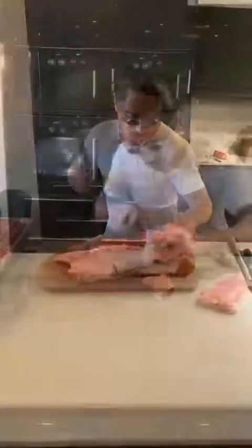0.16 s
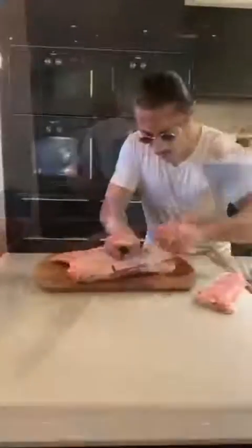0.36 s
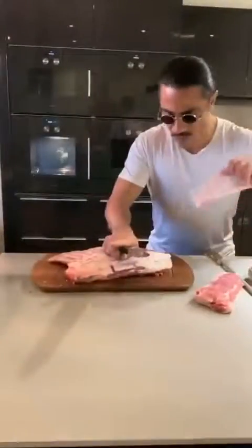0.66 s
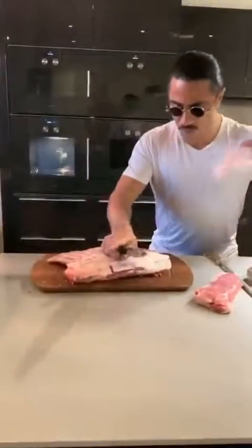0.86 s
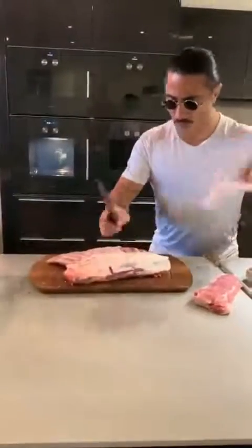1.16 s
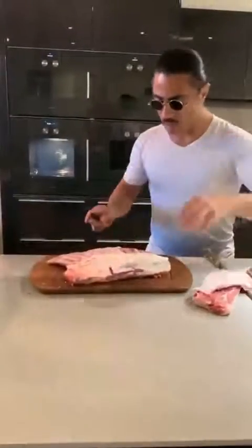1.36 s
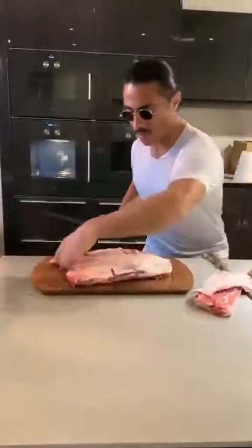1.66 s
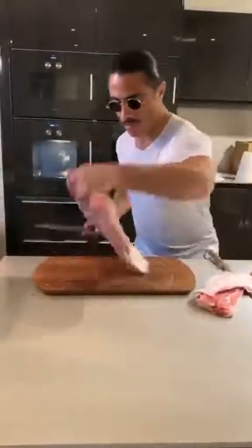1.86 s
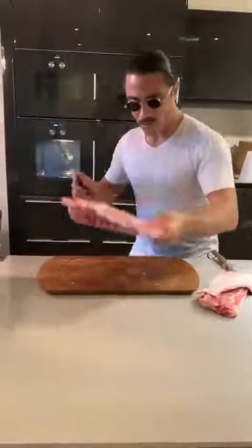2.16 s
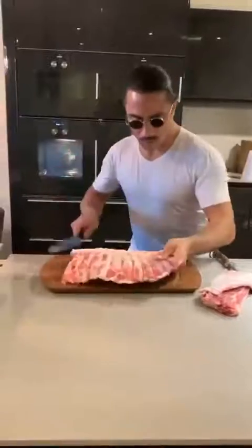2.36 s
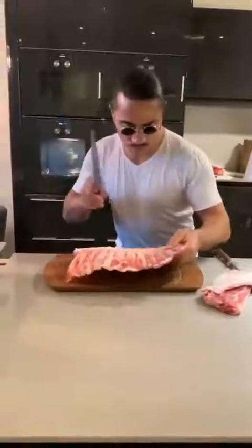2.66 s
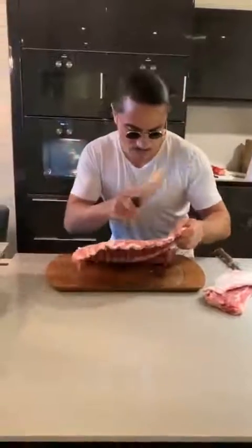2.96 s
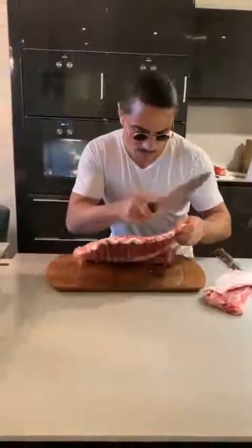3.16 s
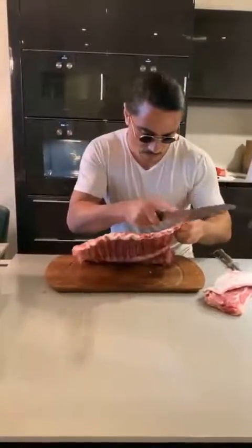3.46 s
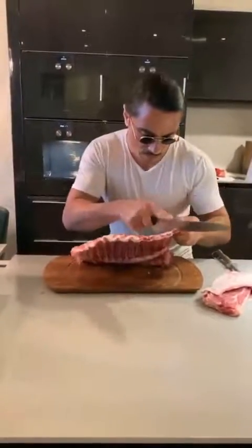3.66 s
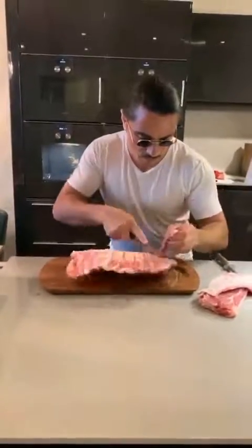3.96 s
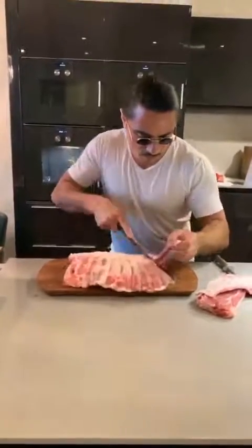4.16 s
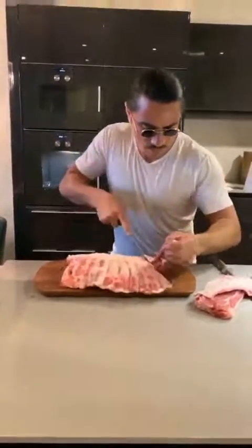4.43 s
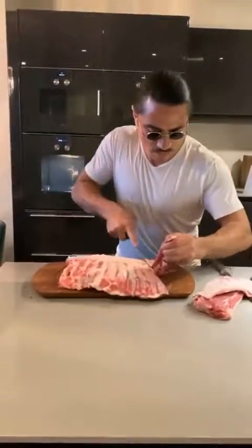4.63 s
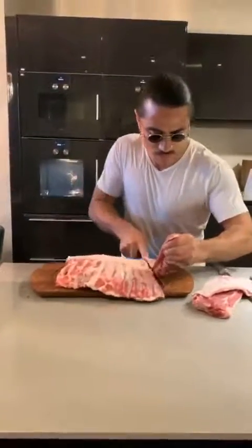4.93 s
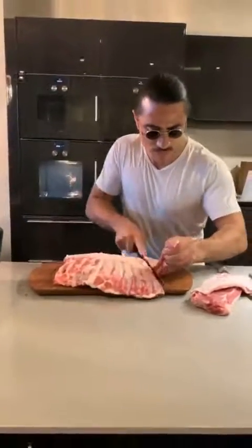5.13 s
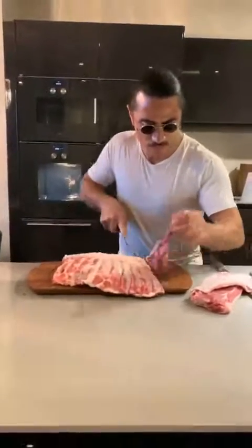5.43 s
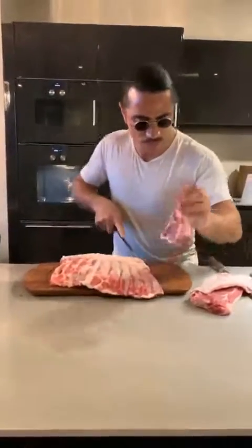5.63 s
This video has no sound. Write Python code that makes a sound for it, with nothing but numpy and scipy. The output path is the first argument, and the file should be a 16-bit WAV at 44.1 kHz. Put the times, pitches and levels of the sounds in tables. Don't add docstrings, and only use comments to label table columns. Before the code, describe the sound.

Phone recording from two metres in a reflective kitchen: constant low hum and fan rumble. Wet meat tears and smacks on wood near the start, a few soft taps follow, then the heaviest double slam about two seconds in, dipping the background. The rest is subdued: faint whistling blade, a cluster of woody knocks, wet slicing and dragging scrapes.

```python
import sys
import numpy as np
from scipy import signal
from scipy.fft import rfft, irfft
from scipy.io import wavfile
from scipy.ndimage import uniform_filter1d

SR = 44100
rng = np.random.default_rng(int(sys.argv[2]) if len(sys.argv) > 2 else 0)


def log_audio(samples):
    frames = np.atleast_2d(samples).T
    limited = np.clip(frames, -1, 1)
    pcm = np.round(limited * 32767).astype(np.int16)
    wavfile.write(sys.argv[1], SR, pcm)


def ratio(d):
    e = np.asarray(d, float) / 20
    return 10 ** e


N = 255339
T = np.arange(N) / SR

# frequency in Hz, level in dB, t60 in seconds.
BOARD_MODES = [(316, -4.5, 0.071), (423.3, 1, 0.032), (547, 3, 0.035), (601, -3.5, 0.067),
               (728, -14, 0.051), (950, -15, 0.015), (1103, 1.5, 0.014), (1314, -1.5, 0.026),
               (1517, 0, 0.036), (1701, -3, 0.045), (1915, 1, 0.037), (2132, -2.5, 0.032),
               (2676, -6.5, 0.042), (2881, -7.5, 0.067), (3292, -0.5, 0.018), (3637, -0.5, 0.034),
               (4076, -7, 0.083), (4360, -4.5, 0.04), (5570, -9, 0.02536)]


def unit(x):
    return x / np.sqrt(np.mean(x ** 2))


def shade(x, points):
    hz, db = np.transpose(points)
    f_hz = np.arange(len(x) // 2 + 1) * SR / len(x)
    gain_db = np.interp(np.log(f_hz + 1), np.log(hz), db, -90, -90)
    return irfft(rfft(x) * ratio(gain_db), len(x))


def ring(x, modes):
    out = 0
    for k, (hz, db, t60_s) in enumerate(modes):
        r = np.exp(-np.log(1000) / (t60_s * SR))
        w = 2 * np.pi * hz / SR
        mode = signal.lfilter([0, r * np.sin(w)], [1, -2 * r * np.cos(w), r * r], x)
        out = out + (-1) ** k * ratio(db) * mode
    return out


def walk(rate_hz):
    k = int(SR / rate_hz)
    held = np.repeat(rng.standard_normal(N)[:N // k + 1], k)
    return unit(uniform_filter1d(uniform_filter1d(held, k), k)[:N])


def grit(spread_db):
    return unit(rng.standard_normal(N) * ratio(spread_db * rng.exponential(size=N)))


def swell(s, db, rise_s, fall_s, hold_s=0):
    early = (s - T) / max(rise_s, .004)
    late = (T - s - max(hold_s, 0)) / max(fall_s, .004)
    return ratio(db - 20 * np.maximum(np.maximum(early, late), 0))


def swells(table):
    return sum(swell(*row) for row in table)


def contact(noise, push):
    x = noise * push
    for _ in range(4):
        spectrum = rfft(x)
        x = irfft(spectrum / (np.abs(spectrum) + 1e-12)) * np.sqrt(push)
    return x * np.sqrt(push)


def blow(noise, db, contact_ms, hardness_oct, spread, spray_db):
    # frequency in Hz, level in dB per Hz.
    spray_spectrum = [(1470, -36), (2500, -21), (3720, -14), (4210, -10.5), (4750, -25.5), (5250, -11.5),
                      (6810, -17.5), (13300, -32.5), (15600, -51)]
    span = np.arange(noise.shape[1]) / SR * 1000 / max(contact_ms, .2)
    push = span * np.exp(-span)
    hz = 250 * 2 ** np.clip(hardness_oct, 0, 5)
    band = signal.butter(3, [hz / spread, hz * spread], "bandpass", fs=SR, output="sos")
    smack = signal.sosfilt(band, contact(noise[0], push))
    board = ring(smack, BOARD_MODES)
    spray = shade(contact(noise[1], push), spray_spectrum)
    parts = (board, 0), (smack, -8.0), (spray, spray_db)
    return ratio(db) * sum(ratio(part_db) * part / np.abs(part).max() for part, part_db in parts)


def blows():
    # frequency in Hz, level in dB, t60 in seconds.
    counter_modes = [(64.8, -3, 0.27), (79.4, -4, 0.22), (138.9, 2, 0.15), (184.4, -1.5, 0.14),
                     (227, 4, 0.064)]
    # start in seconds, peak in dB.
    thumps = [(0.002, -31), (0.06, -34.5), (0.342, -25.5), (0.353, -18.5), (.397, -25.5), (0.446, -40),
              (1.247, -36), (1.599, -34), (1.622, -35), (1.644, -34), (1.992, -44), (2.211, -23),
              (2.2201, -12.5), (2.261, -15.5), (2.269, -19), (2.285, -25.5), (2.309, -25.5), (3.636, -68),
              (3.961, -36), (4.033, -41.5), (4.054, -39.5), (4.626, -41.5)]
    # start in seconds, peak in dB, contact in ms,
    # hardness in octaves over 250 Hz.
    slaps = [(0.002, -32.5, 0.79, 1.05), (0.339, -27, 5.3, 1.51), (0.351, -9, 0.946, 2.55),
             (0.354, -20, 2.1, 1.6), (0.403, -28.5, 7.2, 0.44), (0.446, -26, 0.46, 2.83),
             (1.598, -40.5, 1.8, 2.8), (1.784, -44, 4.2, 3.4), (2.211, -22, 4, 2.33),
             (2.2215, -7.5, 1.2, 2.1), (2.3125, -2.5, 1.93, 2.92), (1.616, -42.5, 2.8, 3.4),
             (4.610, -48.5, 2.7, 3.3), (5.035, -55, 3.7, 4)]
    knocks = [(1.598, -26.5, 2.06, 1.1), (1.614, -37, 7.7, 0.87), (1.649, -35, 3.4, 0.13),
              (1.732, -38.5, 5.7, 0.97), (2.2215, -3.5, 1.9, 1.1), (2.235, -17, 1.5, 0.95),
              (2.245, -20.5, 2.9, 1.05), (2.257, -17, 6.2, 1.2), (2.269, -12.5, 2.4, 1.48),
              (2.282, -18, 7.3, 1.22), (2.308, -12, 3.6, 2.74), (2.3132, -8, 0.58, 0.71),
              (3.457, -47, 1.4, 0.67), (3.668, -58.5, 1.5, 0.34), (4.029, -29.5, 1.4, 1.78),
              (4.030, -27.5, 4.9, 2.65), (4.056, -32, 4.5, 0.044), (4.041, -34, 9.5, 1.78),
              (4.134, -42, 1.6, 0.15), (4.628, -38.5, 1.5, 0.37), (4.788, -49, 5.2, 0.96),
              (3.634, -43.5, 1.03, 0.77), (1.742, -49, 2.3, 3.1)]
    ticks = [(0.060, -44.5, 2.5, 2.9), (0.96, -57, 2.1, 2.3), (1.247, -30.5, 3.6, 2.1),
             (1.261, -35.5, 2.3, 2.6), (1.274, -44, 5.3, 2.6), (1.992, -53, 0.72, 4.6),
             (2.809, -58, 2.9, 5.3), (2.943, -58.5, 2.6, 6.3), (3.379, -73.5, 1.5, 5.5),
             (3.714, -60, 2.8, 4.6), (3.963, -49.5, 4.1, 0.93), (4.278, -61.5, 3.6, 4.7),
             (4.89, -54.5, 5.2, 1.9)]

    size = 16384
    out = np.zeros(N + size)
    t = np.arange(size) / SR
    thump = ring(np.exp(-.5 * ((t - .009) / 0.0015) ** 2), counter_modes)
    thump = thump / np.abs(thump).max()
    for s, db in thumps:
        i = int(s * SR)
        out[i:i + size] += ratio(db) * thump

    kinds = (slaps, -19, 2.05), (knocks, -36, 1.644), (ticks, -5, 2.05)
    for table, spray_db, spread in kinds:
        noises = rng.standard_normal((24, 2, size))
        for (s, db, contact_ms, hardness_oct), noise in zip(table, noises):
            i = int(s * SR)
            out[i:i + size] += blow(noise, db, contact_ms, hardness_oct, spread, spray_db)
    return out[:N]


def cutting():
    # frequency in Hz, level in dB per Hz.
    hiss_spectrum = [(470, -46), (800, -13), (996, -3), (1600, -4), (1910, 1), (2480, -4), (3080, -6),
                     (3380, -7), (6000, -19.5), (7800, -55), (13200, -120)]
    # peak in seconds, peak in dB, s to rise 20 dB, s to fall 20 dB.
    strokes = [(0.001, -46, .01, 0.05), (.07, -63, -1.6, .16), (0.372, -31, 0.0368, 0.1185),
               (.62, -66, 0, 0.2), (.96, -74, 0.2, 0.5), (1.081, -63.5, -0.9, -1.7),
               (1.298, -51, 0.07, -0.2), (1.4, -75, 0.9, 3.3), (1.66, -63.5, 0.12, 0.38),
               (1.79, -54.5, 0, .04), (1.985, -69.5, -0.4, 0.85), (3.4, -77.5, 0.3, 2),
               (3.73, -66, -0.4, 0.2), (3.791, -62, -0.14, 0.26), (3.99, -65.5, -0.55, 0.23),
               (4.05, -46, -0.12, -0.05), (4.14, -68, -0.1, 0.36), (4.455, -67, 0.07, 1.7),
               (4.61, -63, 0.1, -0.7), (4.72, -67, 0.07, 0.45), (4.8, -59.5, 0.13, 0.17),
               (5.04, -58, -0.05, 0.08), (5.1, -50, 0, 0.26), (5.19, -50, 0.04, 0.09),
               (5.3, -62, -0.06, 0.15), (5.77, -64.5, -0.3, .11)]
    hiss = unit(shade(grit(0.83), hiss_spectrum))
    board = unit(ring(shade(grit(2.0), hiss_spectrum), BOARD_MODES))
    return unit(hiss + .3 * board) * ratio(1.4 * walk(30)) * swells(strokes)


def dragging():
    # peak in seconds, peak in dB, s to rise 20 dB, s to fall 20 dB.
    drags = [(0.001, -43.5, -11, 0.1246), (.164, -62.5, -4, 0.3), (0.368, -33, -0.0246, 0.1459),
             (.9, -68, 1.2, 0.2), (1.32, -66, 0.6, 0.15), (1.67, -57.5, 0.24, 0.5),
             (1.786, -63.5, 0.5, 0.8), (2.17, -66, -0.9, 2.5), (3.6, -70.5, 0.1, -3),
             (3.726, -61, 0.3, 0.3), (4.11, -54, 0.16, 0.3), (4.56, -60, 0.2, 0.96),
             (4.68, -56.5, -0.03, 0.34), (4.8, -54.5, 0.1, .2), (4.87, -55.5, .1, -0.15),
             (5.04, -60.5, -0.44, .8), (5.25, -50, -1.1, -0.6)]
    return unit(ring(grit(2.2), BOARD_MODES[1:7])) * ratio(0.55 * walk(25)) * swells(drags)


def sizzling():
    # frequency in Hz, level in dB per Hz.
    sizzle_spectrum = [(2800, -34), (3900, 1), (4600, 1), (5300, -1.5), (6470, 1), (8930, -10.5),
                       (9900, -2.5), (11700, -12), (12600, -4.5), (14300, -5), (14700, -34), (15700, -41)]
    # time of full level in seconds, level in dB, s to rise 20 dB, s to fall 20 dB, hold in
    # # seconds.
    snaps = [(0.068, -77, 0.8, -0.1, 0.018), (.2, -81, 0.7, -3.3, 0.037),
             (0.36, -38.5, -0.04, 0.1363, 0.015), (0.448, -53, 0.12, 0.05, 0.038),
             (0.936, -72.5, 0, 0.12, 0.014), (1.293, -78, 0.14, -0.03, .015), (1.794, -87, 0.6, -1.5, .015),
             (1.985, -82.5, 0.6, 1, 0.016), (3.389, -85, 0.34, 0.9, .015), (3.74, -74.5, 0, 0.17, 0.31),
             (3.826, -71, 0.1, 0.2, 0.018), (4.073, -77, -0.06, 0.2, .04), (4.282, -81, -0.6, .06, 0.031),
             (4.606, -72, .04, -0.3, 0.023), (4.753, -73.5, 0.2, -0.2, .15), (5.078, -67, 0.02, 0.1, 0.19),
             (5.176, -68.5, 0.07, 0.3, 0.032)]
    return unit(shade(grit(1.8), sizzle_spectrum)) * ratio(0.86 * walk(55)) * swells(snaps)


def whistling():
    # peak in seconds, peak in dB, s to rise 20 dB, s to fall 20 dB, pitch in Hz.
    whistles = [
        (1.24, -73, .06, .04, 2310),
        (1.71, -65, .06, .05, 2355),
        (3.39, -71, .07, .1, 2295),
        (3.46, -65, .06, .13, 2285),
        (3.8, -68, .05, .08, 2190),
        (3.93, -68, .08, .16, 2150),
        (5.77, -61, .07, .1, 2146),
    ]
    rows = np.transpose(whistles)
    hz = np.interp(T, rows[0], rows[-1]) * (1 + 0.0042 * walk(60))
    flutter = ratio(2.5 * walk(54))
    level = (ratio(-92) + swells(row[:-1] for row in whistles)) * flutter
    return level * np.sin(2 * np.pi * np.cumsum(hz) / SR)


def room(x):
    # band centre in Hz, t60 in seconds, level in dB.
    room_bands = [(132, 0.77, -10.5), (238.2, 0.65, -5), (514.6, 0.72, -13.5), (963, 0.74, -5),
                  (2020, 0.69, -8.5), (3985, 0.65, -9), (7800, 0.29, -7), (12860, .2, -17)]
    t = T[:SR]
    tail = 0
    for hz, t60_s, db in room_bands:
        octave = [(hz / 2, -20), (hz / 1.3, 0), (hz * 1.3, 0), (hz * 2, -20)]
        band = shade(rng.standard_normal(SR), octave)
        decay = np.exp(-np.log(1000) * t / t60_s) * np.clip(t / 0.0021, 0, 1)
        tail = tail + ratio(db) * band * decay / np.sqrt(np.sum(decay ** 2))
    return signal.fftconvolve(x, tail)[:N]


def kitchen():
    # frequency in Hz, level in dB per Hz.
    rumble_spectrum = [(20, -56.5), (30, -31), (47, -12), (69, -12.5), (100, -14), (128, -16.5), (172, -14),
                       (207, -19), (373, -29), (500, -43.5), (903, -37), (1910, -48.5), (2600, -65),
                       (15000, -74.5)]
    hum_hz, hum_db, rumble_db = 99.9, -42.5, -46.5
    hum = np.sqrt(2) * np.sin(2 * np.pi * hum_hz * T + 0.28 * walk(18))
    hum = hum * ratio(hum_db + 0.93 * walk(9))
    rumble = unit(shade(rng.standard_normal(N), rumble_spectrum))
    return hum + ratio(rumble_db + 0.19 * walk(2.0)) * rumble


def gain():
    # start in seconds, depth in dB, hold in seconds.
    dips = [
        (-.03, 0.5, .31),
        (0.344, 3, 0.039),
        (2.203, 16.5, 0.22),
    ]
    attack_s, release_db_per_s, rest_db = 0.023, 84.5, -1.5
    db = rest_db
    for s, depth_db, hold_s in dips:
        low = s + attack_s
        release = low + hold_s
        times = [s, low, release, release + depth_db / release_db_per_s]
        db = db - np.interp(T, times, [0, depth_db, depth_db, 0])
    return ratio(db)


def scene():
    hits = blows() / gain()
    rubs = (cutting() + dragging() + sizzling()) / gain()
    return (hits + rubs + room(hits + .5 * rubs) + whistling() + kitchen())[None]


def band_limit(x):
    return signal.sosfilt(signal.butter(12, 15720, fs=SR, output="sos"), x)


def record(dry):
    # frequency in Hz, level in dB.
    mic_response = [(10, 0), (4200, 0), (5200, -4), (6300, -1.5), (21000, -1.5)]
    bass_cut = signal.butter(2, 36, "highpass", fs=SR, output="sos")
    thin = signal.sosfilt(bass_cut, shade(dry[0], mic_response)[None])
    ducked = thin * gain()
    return band_limit(1.197 * np.tanh(ducked / 1.185))


dry = scene()
out = record(dry)
log_audio(out)
```